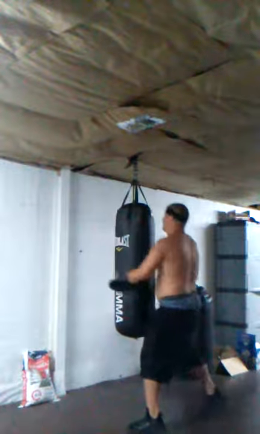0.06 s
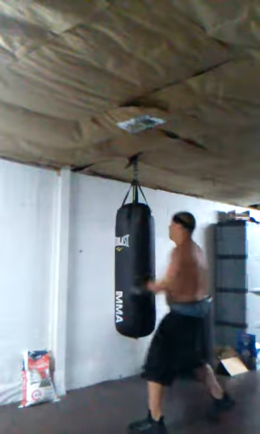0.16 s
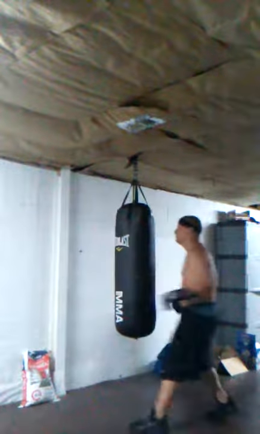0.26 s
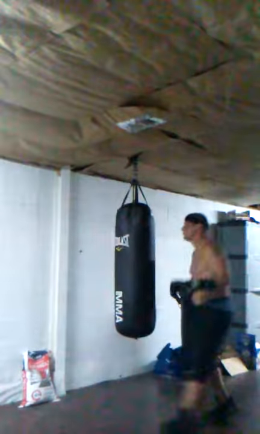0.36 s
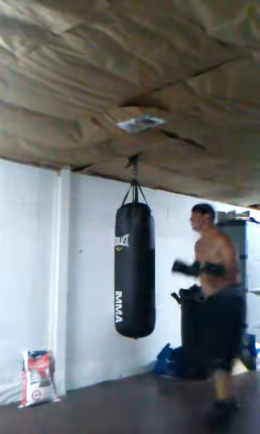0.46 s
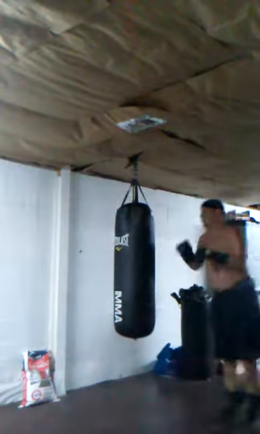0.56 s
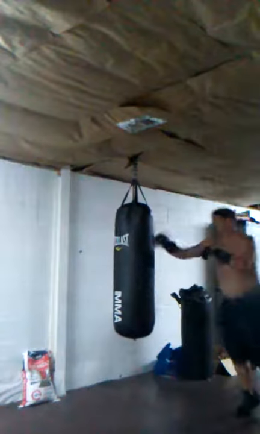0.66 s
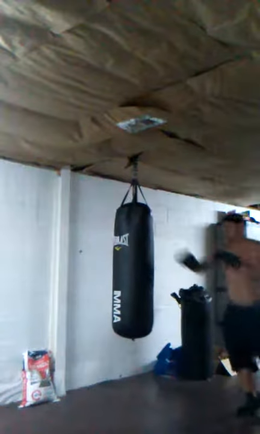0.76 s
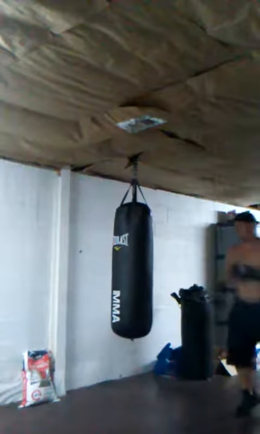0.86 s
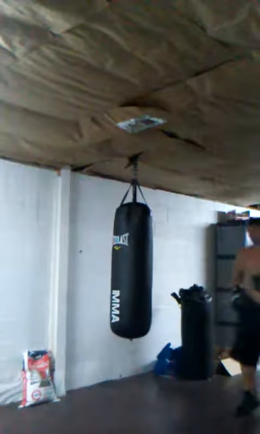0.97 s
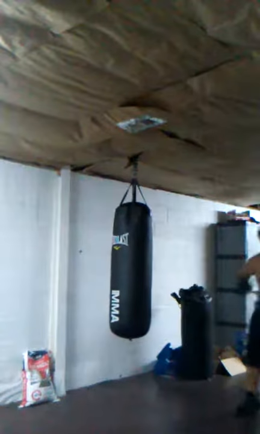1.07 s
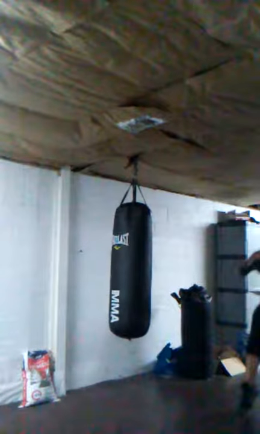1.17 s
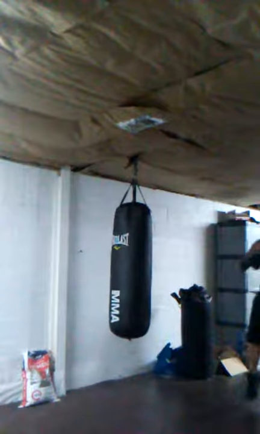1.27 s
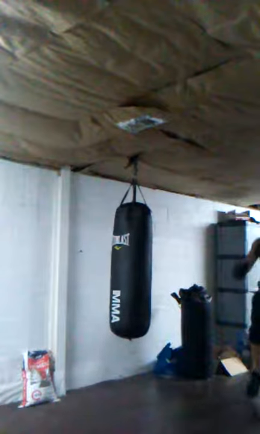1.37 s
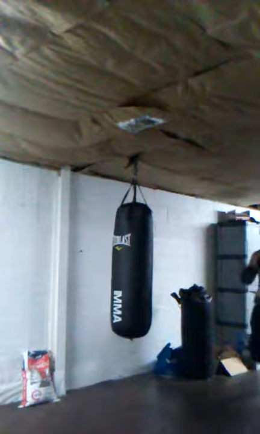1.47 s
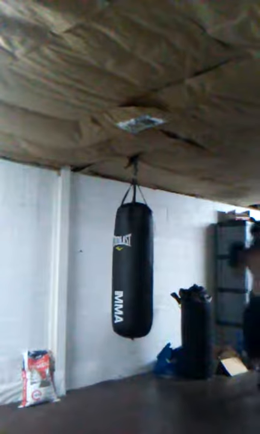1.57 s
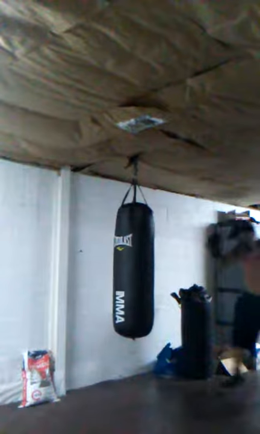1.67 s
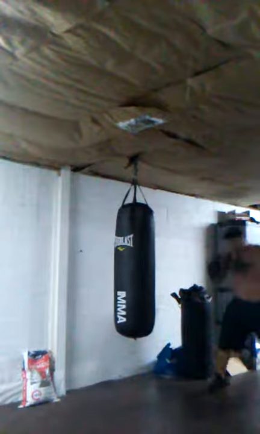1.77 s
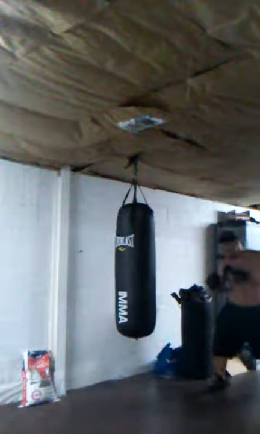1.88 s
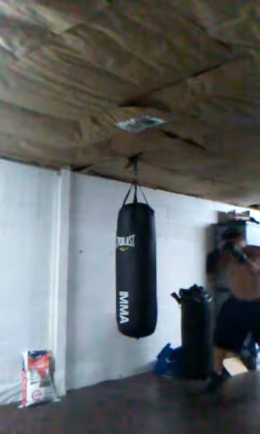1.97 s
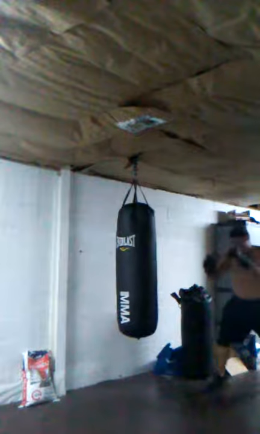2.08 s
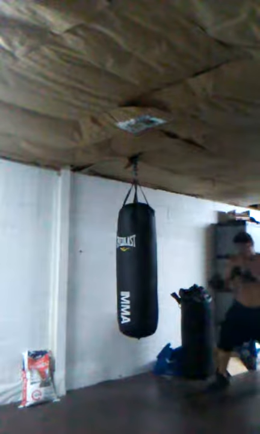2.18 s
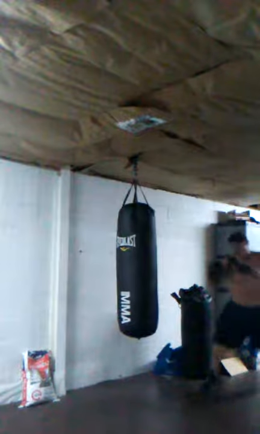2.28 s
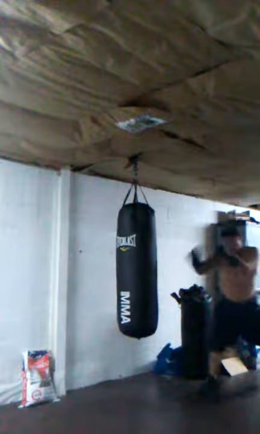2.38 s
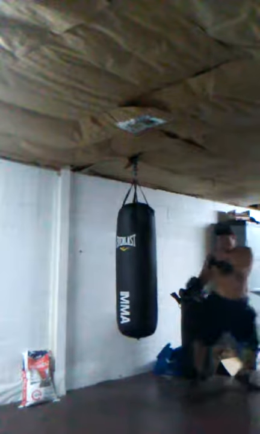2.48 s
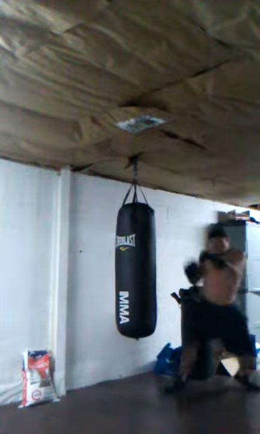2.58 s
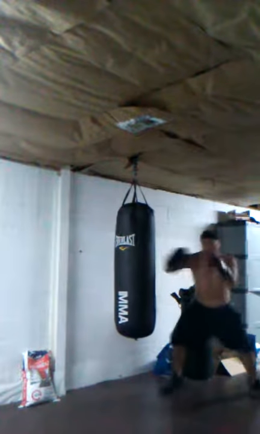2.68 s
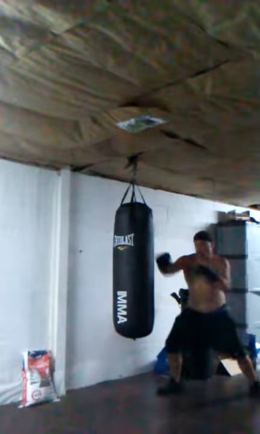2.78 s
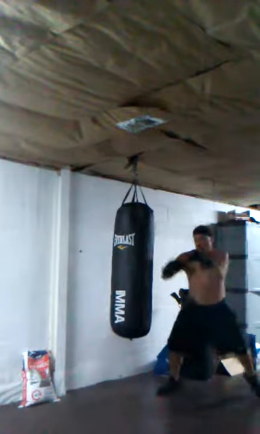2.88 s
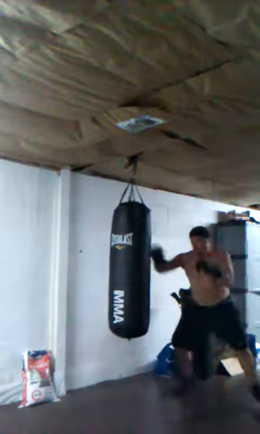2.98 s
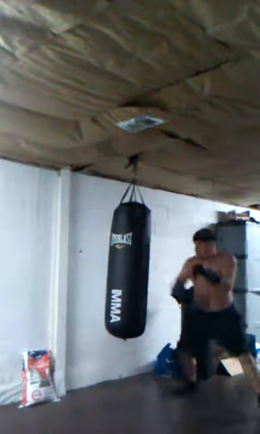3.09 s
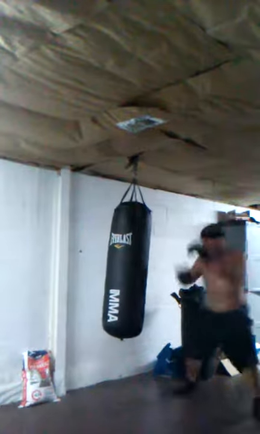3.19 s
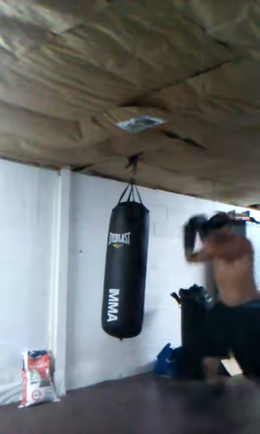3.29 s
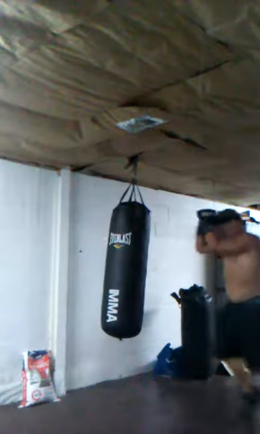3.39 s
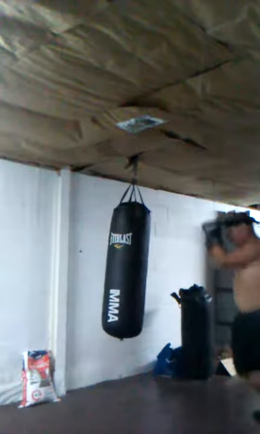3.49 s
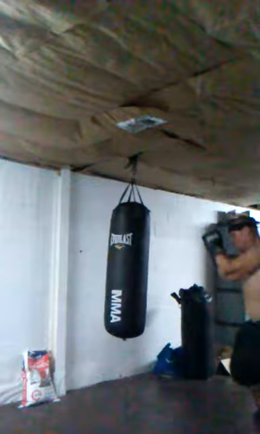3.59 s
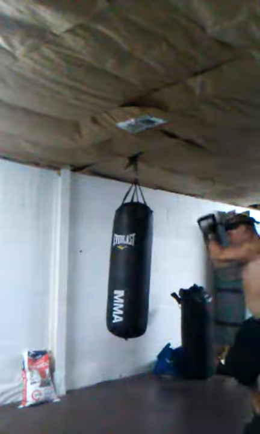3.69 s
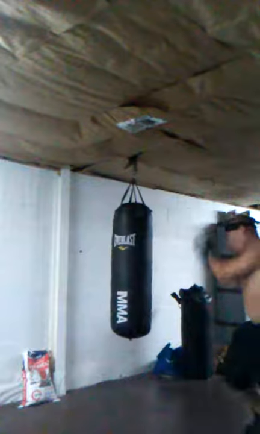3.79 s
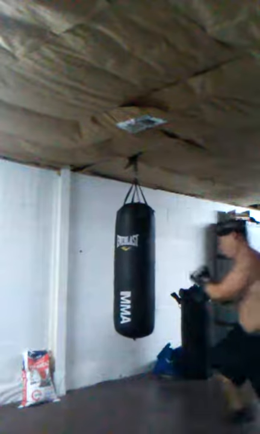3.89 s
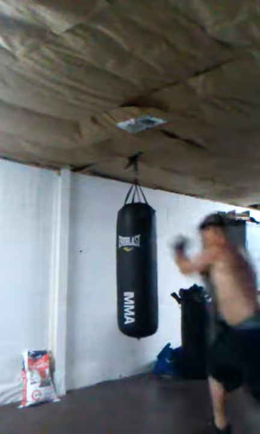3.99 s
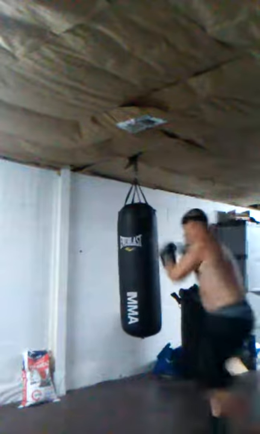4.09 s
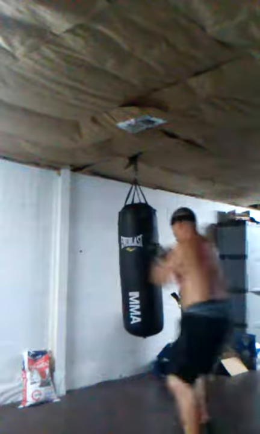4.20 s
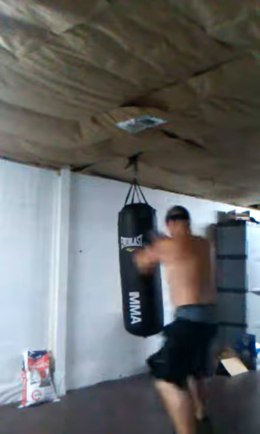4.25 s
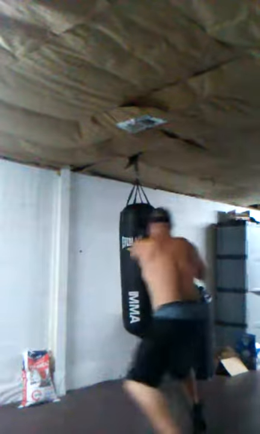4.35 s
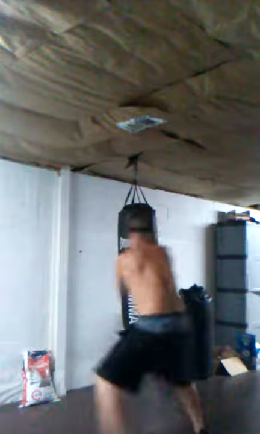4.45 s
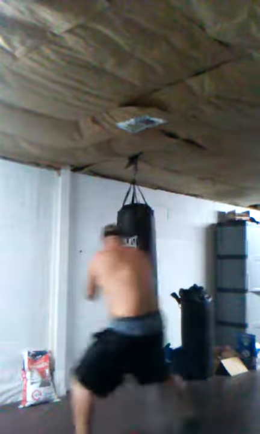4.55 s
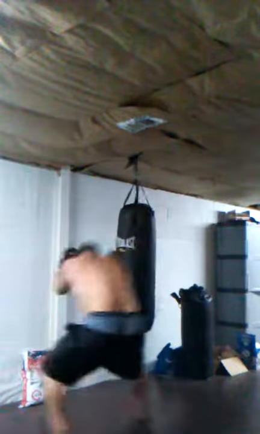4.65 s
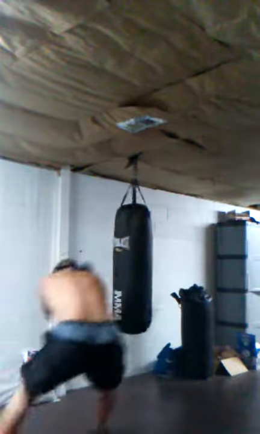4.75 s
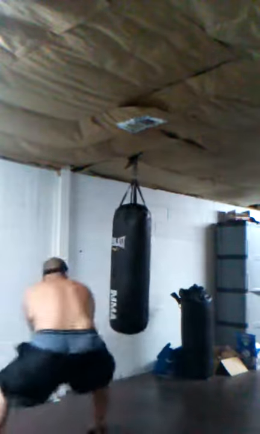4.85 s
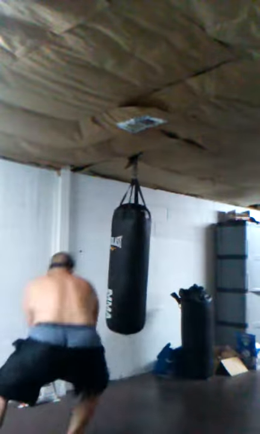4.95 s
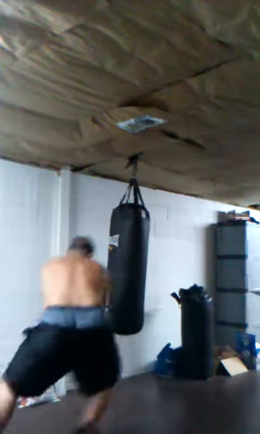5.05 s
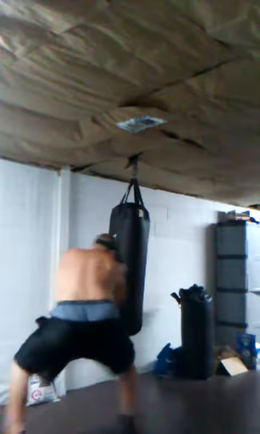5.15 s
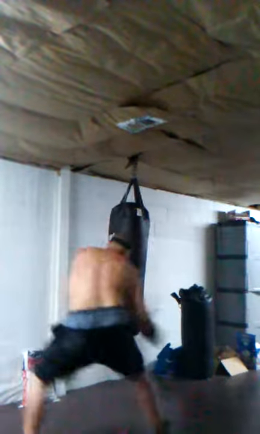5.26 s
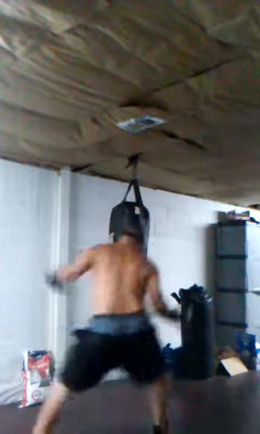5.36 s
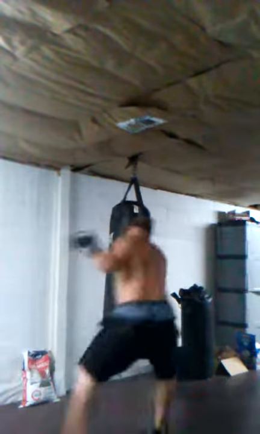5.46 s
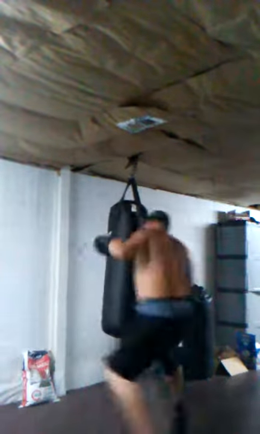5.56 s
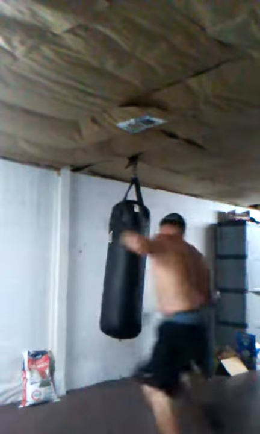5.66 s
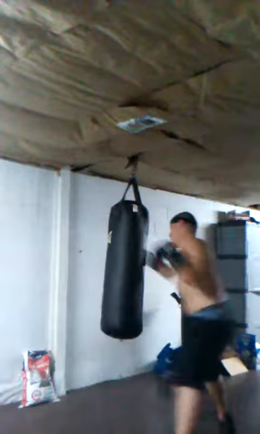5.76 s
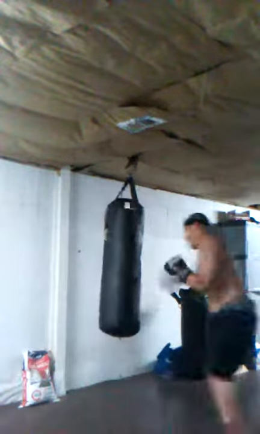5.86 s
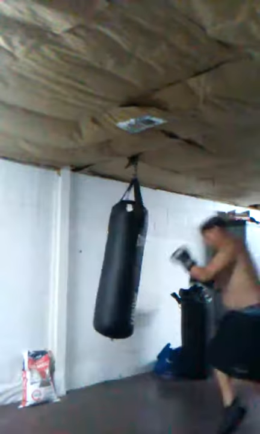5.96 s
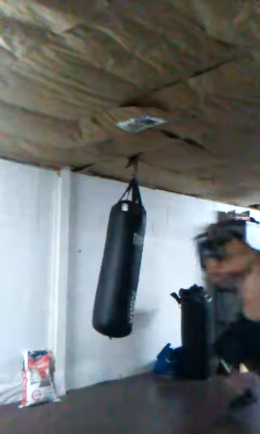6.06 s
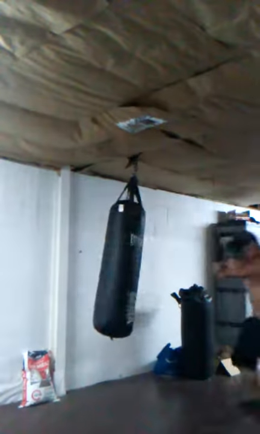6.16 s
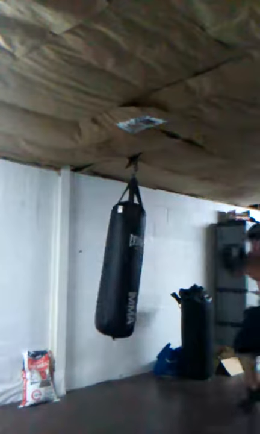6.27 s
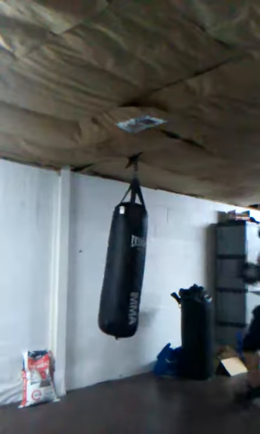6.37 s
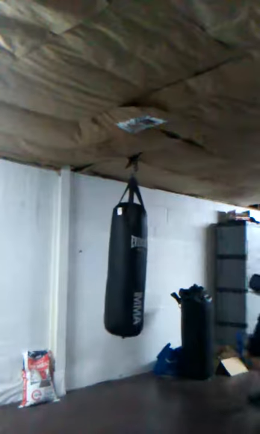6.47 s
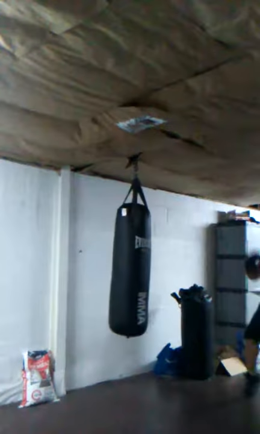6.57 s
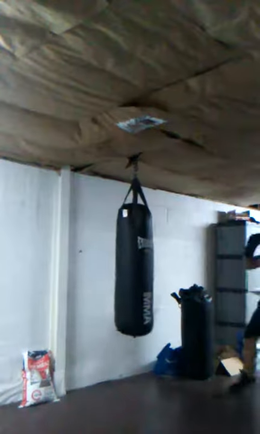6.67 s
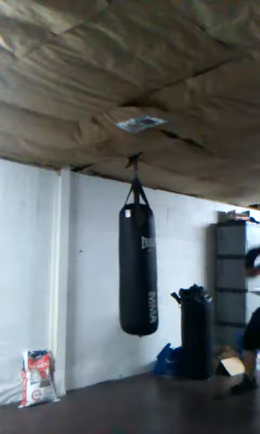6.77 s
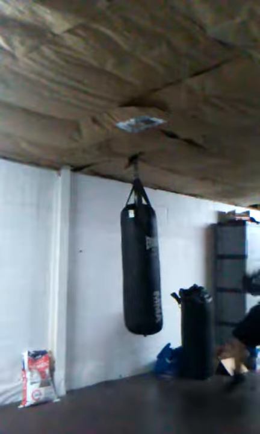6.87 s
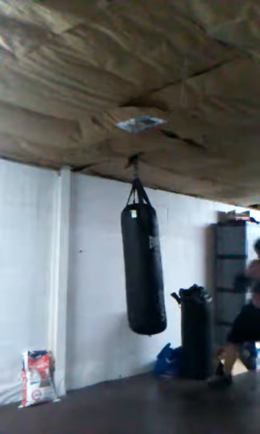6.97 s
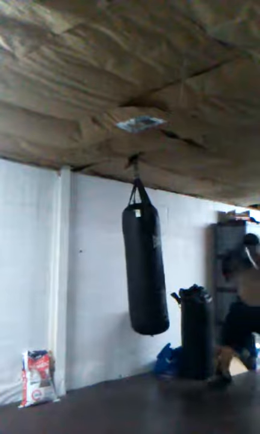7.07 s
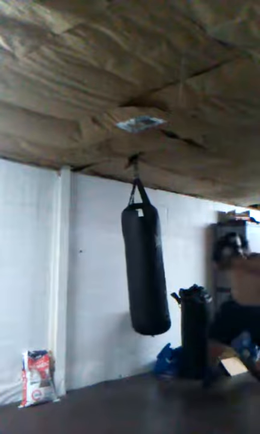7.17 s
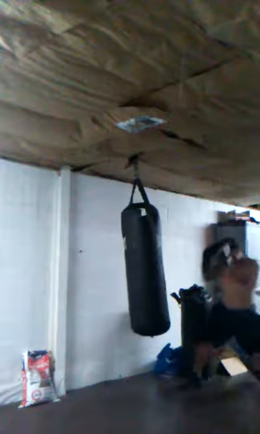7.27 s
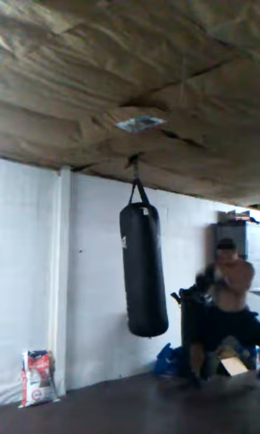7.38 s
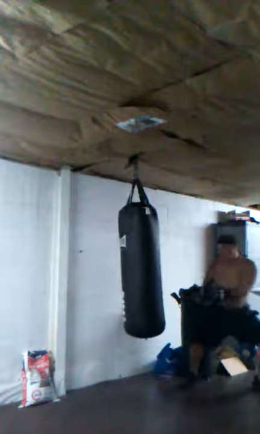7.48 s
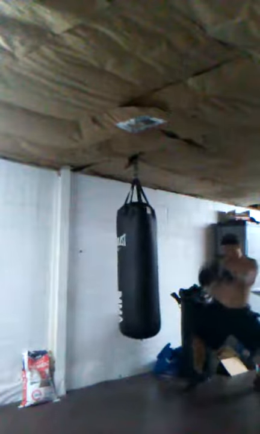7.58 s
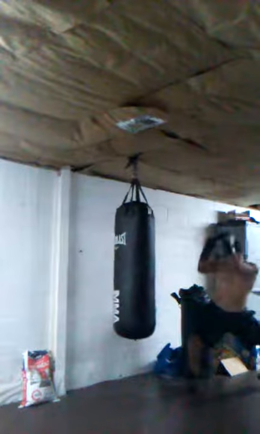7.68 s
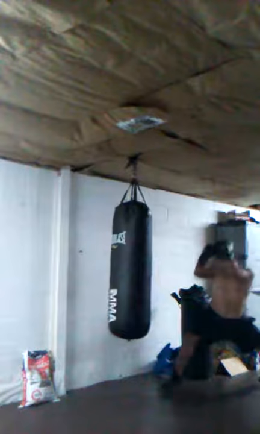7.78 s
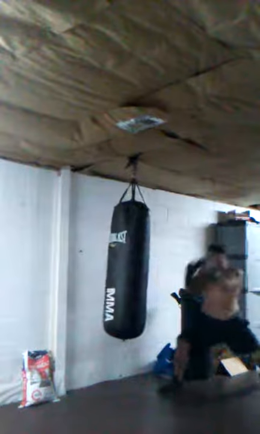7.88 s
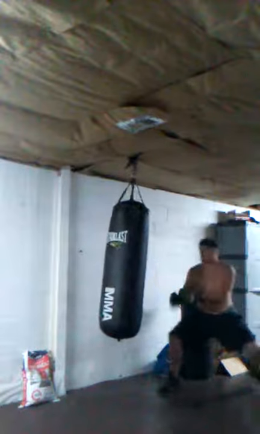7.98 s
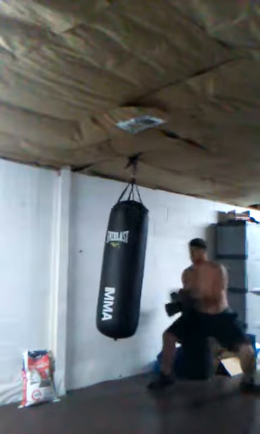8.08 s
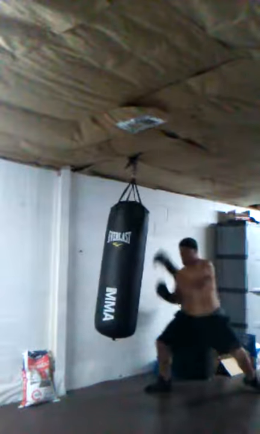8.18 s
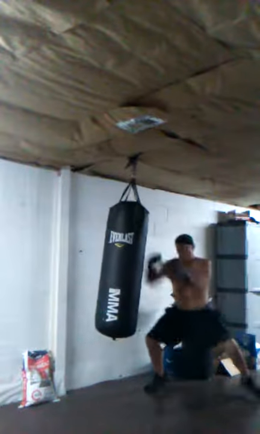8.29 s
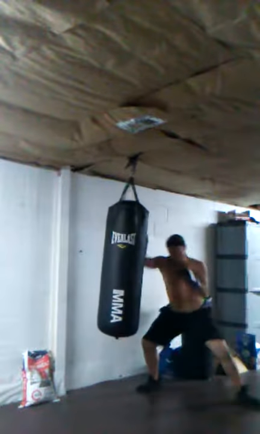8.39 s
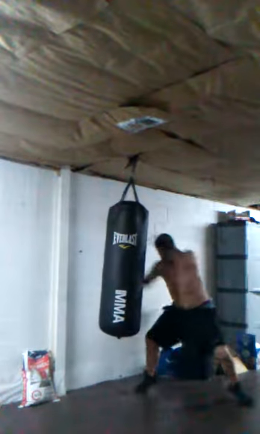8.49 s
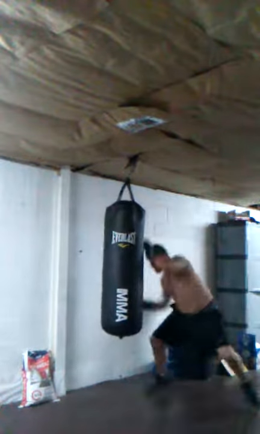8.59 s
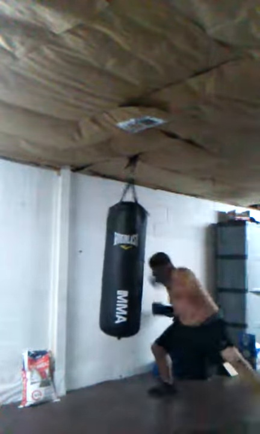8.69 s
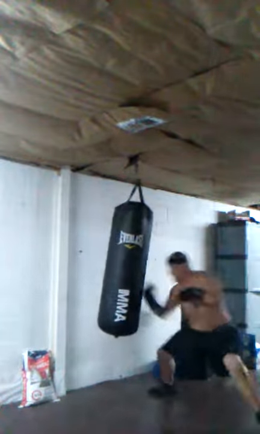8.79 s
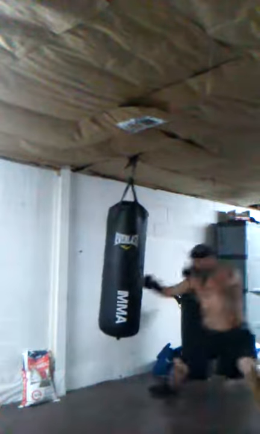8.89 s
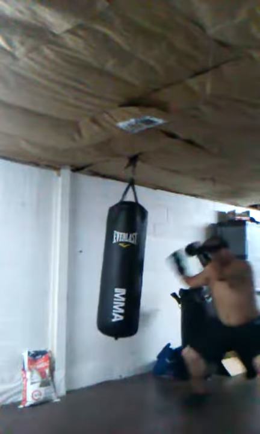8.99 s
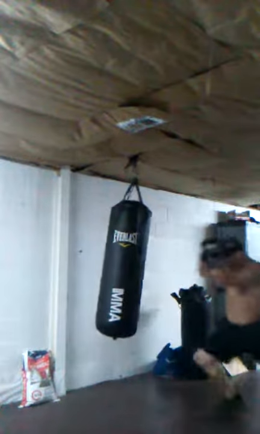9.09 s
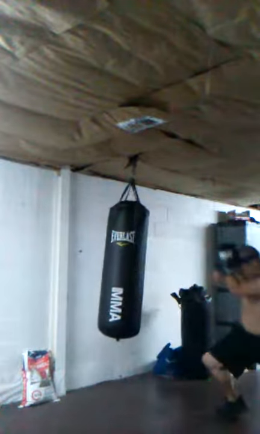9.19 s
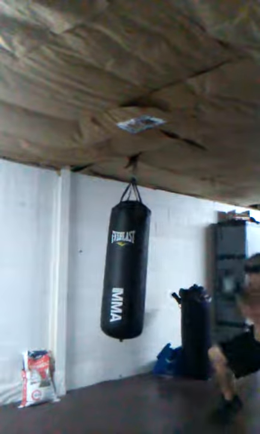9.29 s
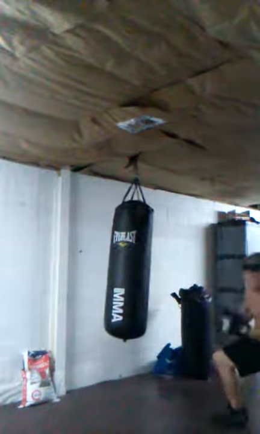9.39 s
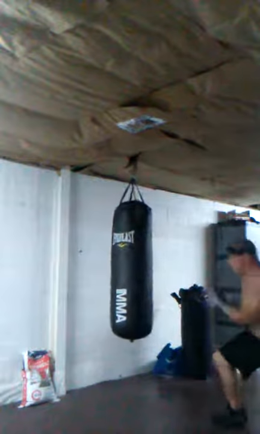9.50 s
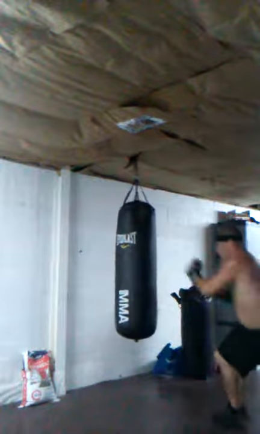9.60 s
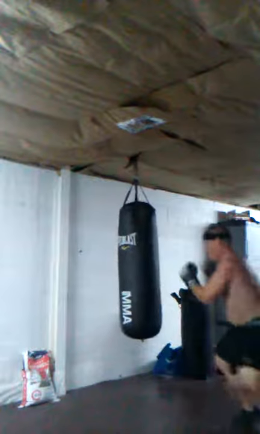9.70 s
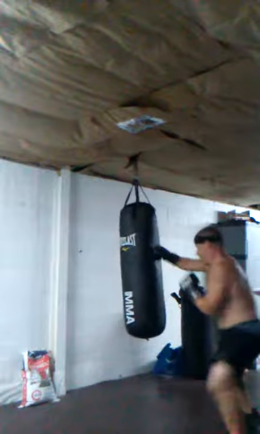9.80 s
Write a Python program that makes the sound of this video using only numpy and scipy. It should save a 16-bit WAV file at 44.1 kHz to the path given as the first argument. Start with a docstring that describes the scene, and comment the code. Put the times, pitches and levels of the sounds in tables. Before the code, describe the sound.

A heavy bag is punched in a small garage with block walls and concrete floor, heard in mono from a few metres. Faint sliding soles open, with a very light glove tap at 0.8 s and soft steps. A firm shoe clap at 2.5 leads to two punches at 2.9 and 3.1, with a tiny high squeak; a soft rustling hiss begins. Scuffs and another faint chirp follow. A hard flurry lands at 4.3-4.6, then chain knocks and a dull groan to 5.2. A sharp stamp-like smack at 5.4, blows at 5.6 and 5.9, and a dense clatter of chain fade by 6.7. Quieter steps and slides follow, a clearer clap at 7.9. The last quick punches hit at 8.5-8.6 and 8.95 with chain jolts and a long scrape; a squeak at 9.3 and light scuffs end it over faint room noise.

```python
"""Heavy bag in a garage

A boxer works a hanging bag between block walls on concrete; a small mono microphone is a few metres away.
Gloves smack the cover (bursts of touches, filtered) and the bag booms (swelling low sines).
Chain and hanger knock, rattle and groan as the bag jerks and swings, through resonant filters.
Shoes clap, slide with a smooth hiss and squeak; a soft rustling hiss rises and falls over faint room noise.
"""
import sys
import numpy as np
from scipy import signal
from scipy.fft import rfft, irfft, next_fast_len
from scipy.io import wavfile
from scipy.ndimage import uniform_filter1d

SR = 44100
rng = np.random.default_rng(int(sys.argv[2]) if len(sys.argv) > 2 else 0)


def waveform_to_disk(signal):
    """Save audio, clipped to [-1, 1], as 16-bit WAV at the path in sys.argv[1]."""
    frames = np.transpose(np.atleast_2d(signal))
    scaled = np.clip(frames, -1, 1) * 32767
    samples = np.round(scaled).astype(np.int16)
    wavfile.write(sys.argv[1], SR, samples)


N = 434385
AGE = np.arange(SR * 3 // 4) / SR   # time since a contact (s)

# gloves on bag, and at 5.37 s a sharp stamp-like smack with hardly any boom;
# thud, slap, sizzle and boom are relative to the smack, which is before the layer gain:
# (time [s], smack [dB], thud [dB], slap [dB], sizzle [dB], boom [dB], pop [Hz])
BLOW_TABLE = [(0.78, -26, -11.5, -5.5, -6.5, -10, 1010), (2.889, -14.5, -13.5, -10, -7.5, -14, 920),
              (3.106, -16, -12.5, -13, -12, -14.5, 930), (4.291, -9.5, -19, -12.5, -12.5, -17, 940),
              (4.446, -17.5, -13, -7, -2, -14.5, 1000), (4.585, -14.5, -13.5, -16, -14.5, -12, 886),
              (5.37, -10.5, -25, -12, -17, -30, 790), (5.6, -12.5, -18.5, -33, -9, -11.5, 654),
              (5.909, -10, -10.5, -7.5, -7.5, -12.5, 1060), (8.473, -13.5, -13, -13, -14.5, -9.5, 1070),
              (8.489, -8.5, -15, -9, -20, -27, 584), (8.639, -14, -13.5, -24, -7, -10, 869),
              (8.95, -13, -15.5, -10.5, -10.5, -9, 850)]
# centres of the thud, smack, slap and sizzle of a contact: [Hz]
COLOUR_CENTRES = [230, 950, 4400, 12500]
# colour of the chain: (frequency [Hz], level per Hz [dB])
CHAIN_COLOUR = [(40, -1.5), (100, 12), (200, 16), (380, 10.5), (700, 5.5), (1100, 1), (2300, 7.5),
                (4500, 5), (8000, -2.5), (16000, -8.5)]
# hanger and joist resonances: (frequency [Hz], width [Hz], peak [dB])
HANGER_MODES = [(156, 35, -3), (330, 42, 6), (553, 65, 2), (1170, 120, 1.5), (1790, 160, 3),
                (2500, 250, -8)]
# colour of the sliding and rustling hiss: (frequency [Hz], level per Hz [dB])
HISS_COLOUR = [(100, -15), (400, -6), (700, -6), (1000, -4), (1500, -6.5), (2100, -6), (3200, -1.5),
               (5000, 1), (8000, -3), (12000, -7), (16000, -8.5)]
# reverberation of the garage: (frequency [Hz], time to fall by 60 dB [s])
GARAGE_T60 = [(100, 0.43), (260, 0.34), (700, 0.32), (1800, 0.36), (4800, 0.34), (6500, 0.4), (13000, 0.32)]


def from_db(db):
    """Decibels to gain."""
    return 10 ** (np.asarray(db) / 20)


def rms_one(x):
    """Scale to rms 1."""
    return x / np.sqrt(np.mean(x ** 2) + 1e-20)


def energy_one(x):
    """Scale to energy 1."""
    return x / np.sqrt(np.sum(x ** 2) + 1e-20)


def at_hz(points, hz):
    """Read a table on a log-frequency axis."""
    known_hz, values = np.transpose(points)
    return np.interp(np.log(hz + 1), np.log(known_hz), values)


def fade(t60):
    """Exponential decay over the life of a contact, falling 60 dB in t60 seconds."""
    return np.exp(-np.log(1000) * AGE / t60)


def add(track, s, sound):
    """Mix a sound into the track from time s on."""
    start = max(round(s * SR), 0)
    track[start:start + len(sound)] += sound[:max(N - start, 0)]


def coloured(x, *spectra, peaks=()):
    """Causal (minimum-phase) filter: the sum of some dB spectra and resonance peaks."""
    size = 2 * next_fast_len(len(x) // 2 + SR // 20)
    hz = np.arange(size // 2 + 1) * SR / size
    db = sum(at_hz(points, hz) for points in spectra)
    for centre_hz, width_hz, peak_db in peaks:
        db = db + peak_db / (1 + (2 * (hz - centre_hz) / width_hz) ** 2)
    # folding the cepstrum onto positive time gives the minimum phase
    cepstrum = irfft(np.log(from_db(db)))
    cepstrum[1:size // 2] *= 2
    cepstrum[size // 2 + 1:] = 0
    response = np.exp(rfft(cepstrum))
    return irfft(rfft(x, size) * response)[:len(x)]


def contact(t60, crush_db, per_s, landing_s=0.0012):
    """A first touch, then a fast run of smaller ones as the surfaces flatten against each other."""
    touches = rng.standard_normal(len(AGE)) * (rng.random(len(AGE)) < per_s / SR)
    landing = 1 - np.exp(-AGE / landing_s)
    force = from_db(crush_db) * energy_one(touches * fade(t60) * landing)
    force[0] += 1
    return energy_one(force)


def garage(wet_db, early_db=1.5, early_t60=0.23, count=9):
    """The room's answer to a blow: scattered early echoes and a tail dying by band."""
    centres = np.geomspace(100, 13000, count)   # overlapping bands (Hz)
    white = rfft(rng.standard_normal(len(AGE)))
    log_hz = np.log1p(np.arange(len(white)) * SR / len(AGE))
    place = np.interp(log_hz, np.log(centres), np.arange(count))
    tail = np.zeros(len(AGE))
    for k, hz in enumerate(centres):
        band = irfft(white * np.maximum(1 - abs(place - k), 0), len(AGE))
        tail += band * fade(at_hz(GARAGE_T60, hz))
    tail = tail * (1 - np.exp(-AGE / 0.0048))   # the tail sets in over some milliseconds
    echoes = rng.standard_normal(len(AGE)) * (rng.random(len(AGE)) < 2500 / SR)   # 2500 per second
    echoes = echoes * fade(early_t60)
    return from_db(early_db) * energy_one(echoes) + from_db(wet_db) * energy_one(tail)


def random_peaks(peak_db, count=16):
    """Random narrow peaks and dips vary the colour from one event to the next: rows (Hz, width Hz, dB)."""
    low_hz, high_hz, low_width_hz = 699.5, 6660, 96
    steps_up = (np.arange(count) + rng.random(count)) / count   # unevenly spaced
    centres = low_hz * (high_hz / low_hz) ** steps_up
    signs = rng.choice([-1, 1]) * (-1) ** np.arange(count)
    return [(hz, low_width_hz * np.sqrt(hz / low_hz), peak_db * sign) for hz, sign in zip(centres, signs)]


def swell(hz, swell_s):
    """A low mode that builds up for swell_s seconds and dies away; its envelope peaks at 1."""
    return np.sin(2 * np.pi * hz * AGE) * AGE / swell_s * np.exp(1 - AGE / swell_s)


def blows(level_db=24.0, boom_db=-5.0, wet_db=0.5, pop_width_hz=260, pop_db=5.0, detune=0.052):
    """A glove smacks the cover and squeezes out a pop of air, the bag's mass booms; one blow is stamp-like."""
    # colour of the smack: (frequency [Hz], level per Hz [dB])
    smack_colour = [(40, -31), (90, -13), (130, 11.5), (200, 23), (380, 17), (700, 5), (980, 2), (1400, 3),
                    (2300, 0.5), (4500, 8), (8000, 3), (12000, -1.5), (16000, -0.5)]
    # the bag's boom in the room, pitch before the random detuning: (frequency [Hz], level [dB], swell time [s])
    boom_modes = [(56.1, 1, 0.031), (80.2, 1, 0.013), (93.4, -7.5, 0.037)]
    out = np.zeros(N)
    for s, db, thud_db, slap_db, sizzle_db, mass_db, pop_hz in BLOW_TABLE:
        smack = contact(t60=0.027, crush_db=12.0, per_s=4000) + garage(wet_db)
        colour = list(zip(COLOUR_CENTRES, [thud_db, 0, slap_db, sizzle_db]))
        smack = coloured(smack, smack_colour, colour, peaks=[(pop_hz, pop_width_hz, pop_db)])
        add(out, s, from_db(db + level_db) * smack)
        for hz, mode_db, swell_s in boom_modes:
            detuned_hz = hz * (1 + detune * rng.standard_normal())
            add(out, s, from_db(db + mass_db + mode_db + boom_db) * swell(detuned_hz, swell_s))
    return out


def knocks(level_db=23.0, ring_q=3.3, ring_db=9.5, vary_db=7.5):
    """Loaded links slip over each other in a few quick jolts, which ring in the links and the hanger."""
    # hard jerks of the chain; thud and clink are relative to the knock, which is before the layer gain:
    # (time [s], knock [dB], thud [dB], clink [dB], ring [Hz])
    jerks = [(4.532, -28, -3, -6.5, 1000), (4.634, -21.5, -5, -2.5, 450), (4.887, -16, -8.5, -9, 425),
             (4.946, -24, -2.5, -11, 587), (5.068, -30.5, -10, 0.5, 1080), (5.165, -28, -8, -15, 1230),
             (5.653, -16, -9, -11.5, 1090), (5.727, -20, -4.5, -15, 1080), (5.976, -23.5, -4, 4.5, 1080),
             (6.039, -17.5, -11, -8.5, 1020), (6.054, -18, -15, -33, 1090), (6.11, -27, -3, -30, 680),
             (6.171, -27.5, -1.5, -6, 1200), (6.246, -24, -10, -8, 1090), (6.268, -26, -5.5, -6, 1040),
             (6.403, -26.5, -10, -8.5, 1070), (6.477, -32.5, 3.5, -4.5, 1000), (6.53, -33.5, -22, -6, 1220),
             (6.589, -28, -17.5, -16, 1110), (6.67, -36.5, -1.5, -16, 1130), (8.619, -18, -16, -5, 611),
             (8.68, -16.5, -17, -18, 1160), (8.73, -21.5, -9, -10.5, 447), (8.795, -21, -33, -19.5, 537),
             (8.871, -28.5, -1, -8, 680), (9.028, -30.5, -2, -7, 460), (9.084, -25, -8, -31, 597),
             (9.167, -24, -18, -17, 480)]
    out = np.zeros(N)
    for s, db, thud_db, clink_db, ring_hz in jerks:
        jolts = contact(t60=0.081, crush_db=9.5, per_s=1300, landing_s=0.0017)
        jolts = jolts + garage(wet_db=-1.5, early_db=-4.0, early_t60=0.15)
        colour = list(zip(COLOUR_CENTRES, [thud_db, 0, clink_db]))
        rings = [*HANGER_MODES, (ring_hz, ring_hz / ring_q, ring_db), *random_peaks(vary_db)]
        add(out, s, from_db(db + level_db) * coloured(jolts, CHAIN_COLOUR, colour, peaks=rings))
    return out


def thumps(swell_s=0.015):
    """When the bag drops back into its chain, the joist groans under the load on a dull note."""
    # joist notes: (time [s], pitch [Hz], level [dB])
    groans = [(4.634, 163, -28), (4.886, 150, -37), (6.676, 103, -35.5)]
    out = np.zeros(N)
    for s, hz, db in groans:
        add(out, s, from_db(db) * swell(hz, swell_s))
    return out


def tug(rise_s=0.11, loss_db_per_s=17.5, follows=0.86):
    """How hard the bag pulls at its hanger: a tug per table row builds up and dies away, adding in power."""
    power = np.zeros(N)
    for s, db, *_ in BLOW_TABLE:
        age = np.maximum(np.arange(N) / SR - s, 0)
        # follows: dB of tug per dB of smack
        pull = from_db(follows * db - loss_db_per_s * age) * (1 - np.exp(-age / rise_s))
        power += pull ** 2
    return np.sqrt(power)


def rattle(level_db=-55.5, per_s=150, stick_db=-15.5):
    """While the bag swings, small uneven slips keep the hanger chattering; under a weak tug the links stick."""
    pull = tug()
    slipping = pull ** 2 / (pull ** 2 + from_db(stick_db) ** 2)
    ticks = rms_one(rng.standard_normal(N) * (rng.random(N) < per_s / SR))
    slips = pull * slipping * ticks
    slips = slips + signal.fftconvolve(slips, garage(wet_db=-6.5))[:N]
    # extra weight low down: (frequency [Hz], level [dB])
    weight = [(40, 1), (100, 15.5), (220, 2.5), (400, 3), (1500, -7.5), (5000, -14.5)]
    return from_db(level_db) * rms_one(coloured(slips, CHAIN_COLOUR, weight, peaks=HANGER_MODES))


def steps(level_db=23.5, wet_db=0.0, pop_q=3.8, pop_db=6.5, landing_s=0.0021,
          sizzle_db=-12.5, sizzle_follows=0.77, vary_db=5.5):
    """A sole lands on the concrete and traps a pocket of air: a hollow clap with little weight."""
    # shoe on concrete; thud and slap are relative to the smack, which is before the layer gain:
    # (time [s], smack [dB], thud [dB], slap [dB], pop of air [Hz])
    footfalls = [(0.582, -38, -5, -19, 1080), (1.03, -50.5, -5, -4, 700), (1.093, -47, -4, -20, 455),
                 (1.532, -38, -18, -17, 470), (1.92, -29.5, -16, -7.5, 524),
                 (2.272, -32.5, -31, -25.5, 740), (2.486, -16.5, -21.5, -8.5, 1050),
                 (2.728, -28.5, -14, -5, 490), (2.875, -23.5, -2, -8, 533), (3.293, -23, 1, -4.5, 1050),
                 (3.631, -44, 12.5, 6, 767), (3.768, -38.5, -17, 3, 1240), (4.111, -26.5, 0, 0, 920),
                 (5.83, -20.5, -22.5, -14.5, 580), (6.84, -26.5, -9, -3.5, 700),
                 (7.106, -33.5, -6.5, -9.5, 525), (7.391, -35, 2, 3.5, 3280),
                 (7.949, -19, -12.5, -4.5, 4100), (8.244, -30, -3, 0, 457), (9.315, -28.5, 7.5, -2.5, 1030)]
    # colour of sole on concrete: (frequency [Hz], level per Hz [dB])
    sole_colour = [(40, -11), (130, 9), (250, 8.5), (450, 12.5), (700, 7.5), (1050, 4), (2200, 1.5),
                   (4200, 4), (8000, 2.5), (12000, -1.5), (16000, -4.5)]
    out = np.zeros(N)
    for s, db, thud_db, slap_db, pop_hz in footfalls:
        clap = contact(t60=0.052, crush_db=10.0, per_s=5000, landing_s=landing_s)
        clap = clap + garage(wet_db) * (1 - np.exp(-AGE / landing_s))
        top_db = sizzle_db + sizzle_follows * slap_db   # the sizzle partly follows the slap
        colour = list(zip(COLOUR_CENTRES, [thud_db, 0, slap_db, top_db]))
        peaks = [(pop_hz, pop_hz / pop_q, pop_db), *random_peaks(vary_db)]
        add(out, s, from_db(db + level_db) * coloured(clap, sole_colour, colour, peaks=peaks))
    return out


def squeaks(level_db=0.5, octave_db=-18.0, sag=0.093):
    """Rubber sticks and slips for an instant: a high wavering chirp that rings on in the room."""
    # rubber sole squeaking, level before the layer gain:
    # (time [s], length [s], mean pitch [Hz], level [dB], pitch waver [share of pitch])
    chirps = [(2.850, 0.022, 6410, -19.5, 0.017), (2.885, 0.059, 6500, -27.5, 0.0068),
              (3.913, 0.0156, 6140, -26.5, 0.12), (9.313, 0.023, 5870, -23, 0.033)]
    out = np.zeros(N)
    for s, length, hz, db, waver in chirps:
        phase = np.minimum(AGE / length, 1)
        wobble = rms_one(uniform_filter1d(rng.standard_normal(len(AGE)), size=60))
        pitch_hz = hz * (1 + waver * wobble - sag * (phase - .5))   # sags along the chirp
        turn = 2 * np.pi * np.cumsum(pitch_hz) / SR
        tone = np.sin(turn) + from_db(octave_db) * np.sin(2 * turn)
        chirp = np.sqrt(abs(np.sin(np.pi * phase))) * tone
        chirp = chirp + signal.fftconvolve(chirp, garage(wet_db=-6.5))[:len(AGE)]
        # chirp and room together get an energy in proportion to the length
        add(out, s, from_db(db + level_db) * energy_one(chirp) * np.sqrt(2 * length * SR))
    return out


def slides(level_db=3.5, spread_db=-1.0, flutter_db=2.0, lift_s=0.042, wet_db=-7.0, vary_db=5.5):
    """A sole slides over the concrete with a dense, smooth hiss; the pressure swells, flutters and lifts."""
    # sliding sole, level before the layer gain, length before the lift:
    # (time [s], length [s], level [dB], treble tilt [dB])
    scrapes = [(0.034, 0.13, -48.5, 12.5), (0.411, 0.21, -35.5, 8), (0.608, 0.26, -48, 4),
               (1.553, 0.16, -48, 5.5), (1.781, 0.055, -47.5, 2.5), (2.063, 0.056, -57, 9),
               (2.237, 0.086, -51.5, 7), (3.367, 0.21, -40.5, -1.5), (3.627, 0.11, -42, -4.5),
               (3.794, 0.21, -38, -2), (4.149, 0.039, -46, 15), (4.751, 0.15, -32, 5),
               (5.011, 0.056, -38, 1), (5.204, 0.01, -40.5, -3), (5.525, 0.11, -28, -2),
               (5.916, 0.19, -31.5, 1), (6.324, 0.054, -40.5, -2), (6.446, 0.15, -45, 5.5),
               (6.729, 0.046, -44, -0.5), (6.903, 0.068, -44.5, -5), (7.149, 0.058, -46.5, -4),
               (7.284, 0.014, -50.5, 6), (7.672, 0.21, -51, 13), (8.143, 0.035, -45, 7),
               (8.437, 0.36, -30, 2), (8.989, 0.22, -40, -0.5), (9.375, 0.099, -39, -0.5),
               (9.712, 0.1, -42.5, 8.5)]
    out = np.zeros(N)
    room = fade(at_hz(GARAGE_T60, 6000))
    for s, length, db, tilt_db in scrapes:
        flutter = rms_one(uniform_filter1d(rng.standard_normal(len(AGE)), size=700))
        stroke = np.sin(np.pi * np.minimum(AGE / (length + lift_s), 1))
        pressure = stroke * from_db(flutter_db * flutter)
        uneven = from_db(spread_db * rng.standard_normal(len(AGE)))
        hiss = rms_one(rng.standard_normal(len(AGE)) * uneven)
        # the room stores the power of the scrape and gives it back as a smooth hiss
        stored = np.sqrt(abs(signal.fftconvolve(pressure ** 2, energy_one(room) ** 2)[:len(AGE)]))
        scrape = pressure * hiss + from_db(wet_db) * stored * rng.standard_normal(len(AGE))
        tilt = [(4500, -tilt_db / 2), (12000, tilt_db / 2)]
        scrape = coloured(scrape, HISS_COLOUR, tilt, peaks=random_peaks(vary_db))
        add(out, s, from_db(db + level_db) * scrape)
    return out


def rustle(level_db=-14.0, spread_db=0.5):
    """A soft rustling hiss, rising and falling from 2.49 to 9.64 s: coloured noise under a level curve."""
    # level of the hiss, before the layer gain: (time [s], level [dB])
    level_curve = [(2.49, -39.5), (2.99, -32.5), (4.26, -41), (4.48, -35), (4.94, -37.5), (5.18, -39),
                   (6.13, -35), (6.69, -51), (7.69, -48), (7.93, -42.5), (8.5, -42), (8.64, -48),
                   (8.76, -29.5), (9.3, -34.5), (9.56, -50), (9.64, -63)]
    s, db = np.transpose(level_curve)
    curve_db = np.interp(np.arange(N) / SR, s, db, left=-120, right=-120)
    hiss = rng.standard_normal(N) * from_db(spread_db * rng.standard_normal(N))
    return from_db(level_db + curve_db) * rms_one(coloured(hiss, HISS_COLOUR))


def still_room(level_db=-58):
    """The faint steady noise of the still room: coloured noise, mostly low."""
    # colour of the still room: (frequency [Hz], relative level per Hz [dB])
    quiet_colour = [(15, -34.5), (25, -27), (60, -12.5), (133, -9), (169, -14.5), (359, -14), (469, -17.5),
                    (552, -25), (762, -24.5), (2230, -37.5), (6380, -36.5), (7700, -31.5), (11800, -36.5),
                    (15500, -37)]
    return from_db(level_db) * rms_one(coloured(rng.standard_normal(N), quiet_colour))


def scene():
    """Bag, hanger, footwork and rustling hiss over the faint noise of the room."""
    bag = blows() + knocks() + thumps() + rattle()
    footwork = steps() + squeaks() + slides()
    return (bag + footwork + rustle() + still_room())[None, :]


def record(dry):
    """The microphone has a hollow in the treble and no deep bass; peaks overload and the top is cut."""
    # microphone response: (frequency [Hz], level [dB])
    microphone = [(20, -16.5), (42, 4.5), (6400, 1), (7400, -4.5), (8400, -6.5), (9500, -1.5), (11000, 6.5)]
    wave = np.clip(coloured(dry[0], microphone), -1, 1)
    top_cut = signal.ellip(12, .1, 80, 15900, fs=SR, output="sos")   # steep low-pass at 15900 Hz
    return signal.sosfilt(top_cut, wave)[None, :]


dry = scene()
out = record(dry)
waveform_to_disk(out)
```